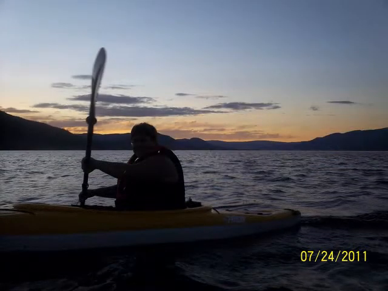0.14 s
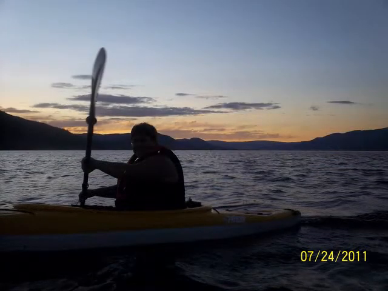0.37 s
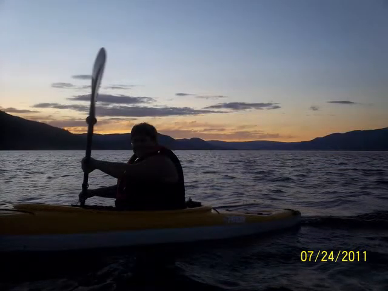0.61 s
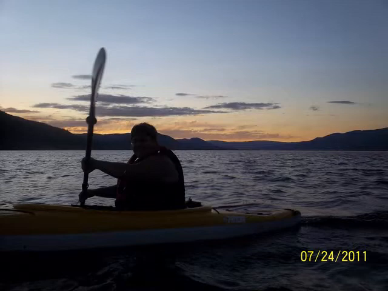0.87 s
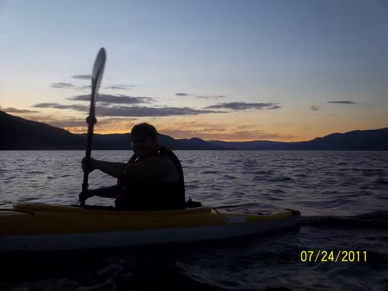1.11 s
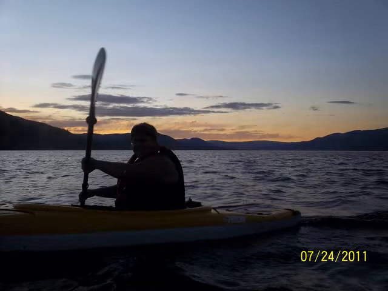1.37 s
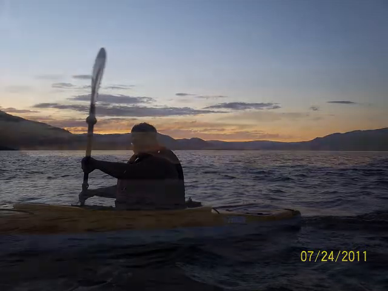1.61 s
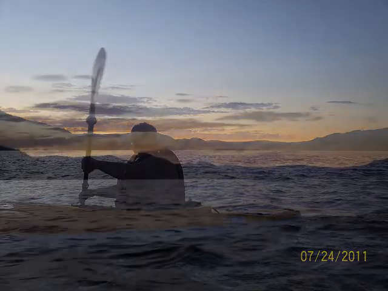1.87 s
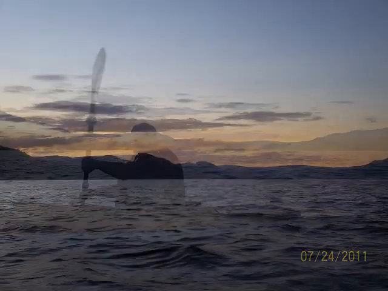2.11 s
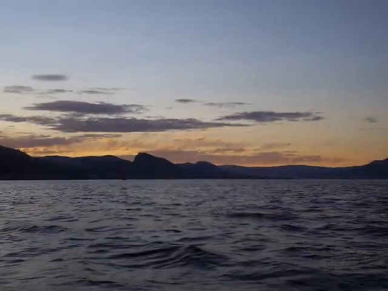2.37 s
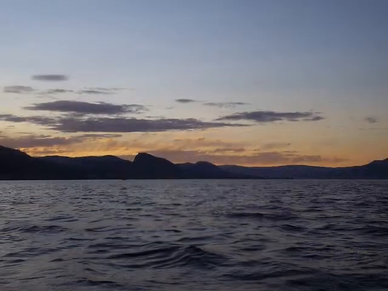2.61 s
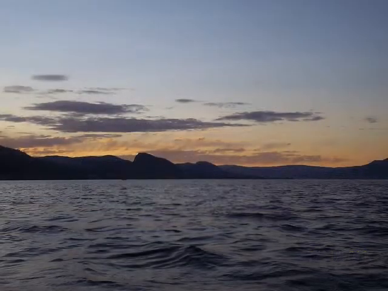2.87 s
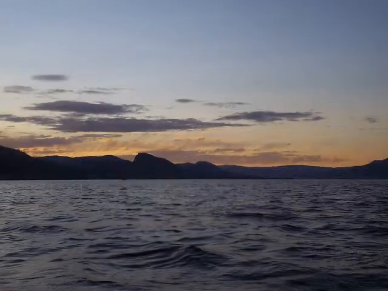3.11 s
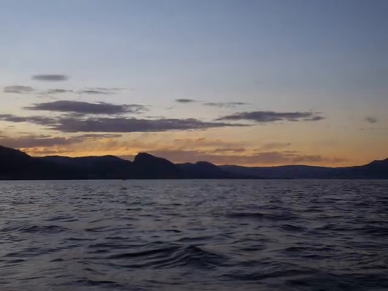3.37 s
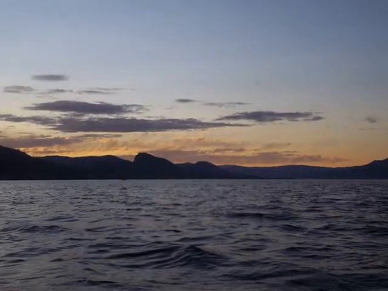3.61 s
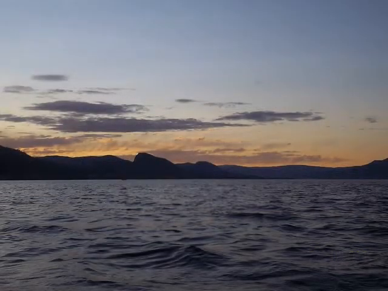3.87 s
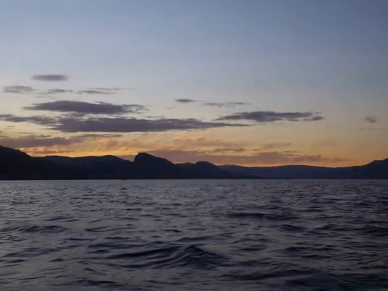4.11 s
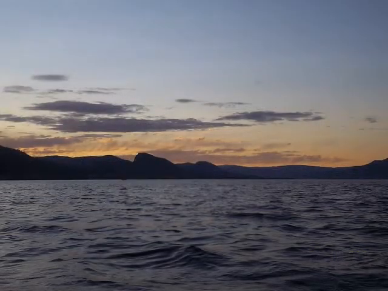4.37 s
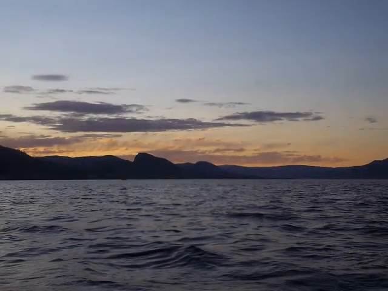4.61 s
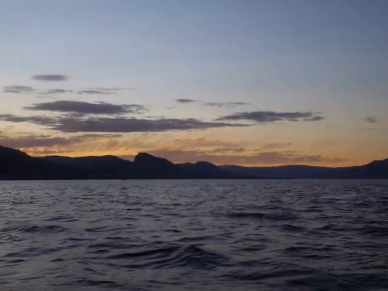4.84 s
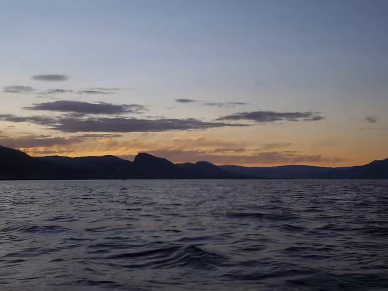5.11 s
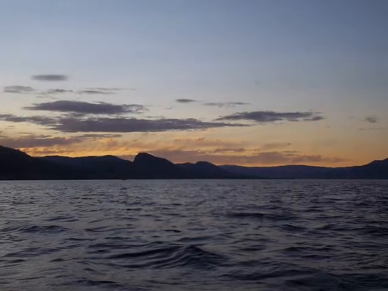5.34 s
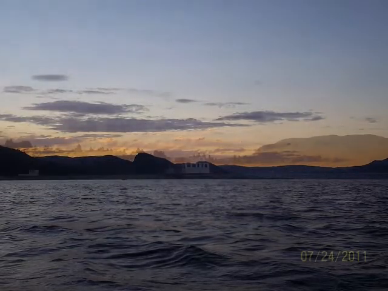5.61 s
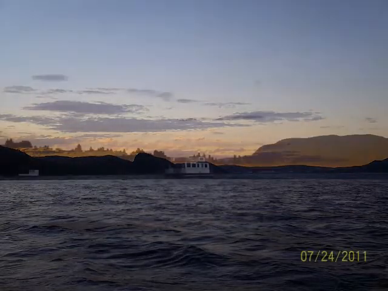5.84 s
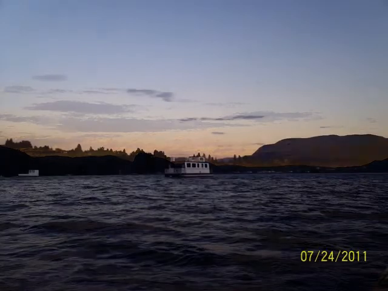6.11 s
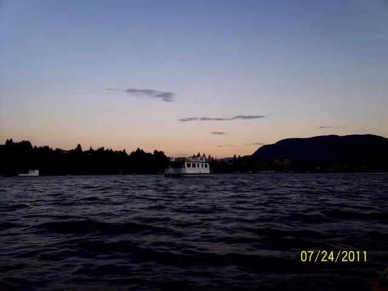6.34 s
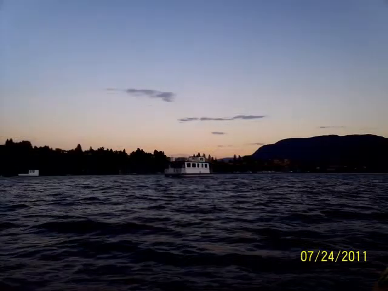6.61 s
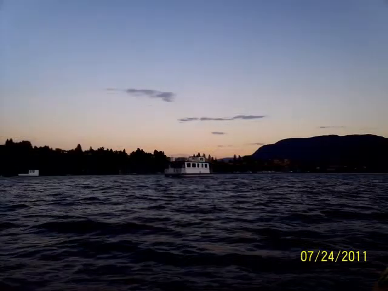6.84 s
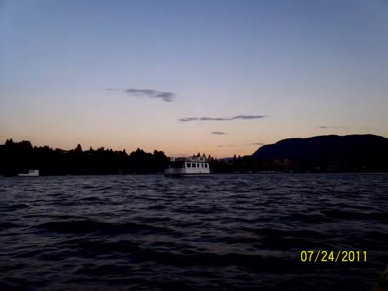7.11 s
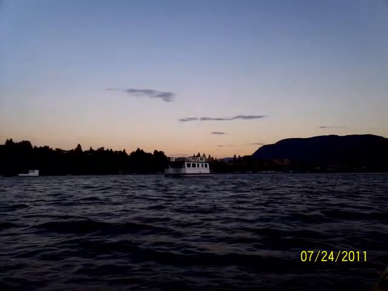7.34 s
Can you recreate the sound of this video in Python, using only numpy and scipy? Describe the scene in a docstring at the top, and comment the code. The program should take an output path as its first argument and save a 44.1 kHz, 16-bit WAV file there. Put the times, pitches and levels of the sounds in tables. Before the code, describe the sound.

Geese call over a wide lake for about seven and a half seconds, heard in mono with limited treble and brief, dull echoes. From 0 to 2 seconds, short reedy honks come in small clusters, low and high voices alternating, with gaps around 1.3 and 1.8 seconds. Between 2 and 3 seconds, another cluster includes growls breaking upward and a wavering high call; then a short lull. From 3.6 seconds the flock becomes louder, with a strong drawn low honk near 4.4. After 5 seconds, calls overlap thickly, nasal and raspy, with sharp breaks around 5.4, 5.9 and 6.4, continuing to the end. Faint distant honks murmur throughout. A very quiet water wash lies below, with weak hollow hull knocks near 0.5, 2.8, 4.4 and 5.8, tiny drip ticks near 1.6, 2.2 and 5.7, and a faint low hum gliding upward after 2 seconds.

```python
"""Geese calling over a wide lake

A flock of geese honks over water, a few calls at first, then more of them and louder.
Each honk is a stack of reedy tones shaped by a long throat; many start as a growl and break upward with a rasp.
Faint honks murmur far off. Filtered noise washes below, short low rings knock on a hull and drops tick.
A faint low hum rises in pitch.
"""
import sys
import numpy as np
from scipy import signal
from scipy.fft import rfft, irfft
from scipy.io import wavfile
from scipy.ndimage import uniform_filter1d

SR = 44100
rng = np.random.default_rng(int(sys.argv[2]) if len(sys.argv) > 2 else 0)


def elevation(decibels):
    """Turn decibel levels (scalar or array-like) into linear amplitude ratios."""
    levels = np.asarray(decibels, float)
    return 10 ** (levels / 20)


def output_pcm(signal):
    """Save a mono or channel-first signal as 16-bit PCM at the path in sys.argv[1].

    Samples are clipped to [-1, 1] before scaling.
    """
    pcm = np.clip(np.atleast_2d(signal).T, -1, 1) * 32767
    wavfile.write(sys.argv[1], SR, np.round(pcm).astype(np.int16))


N = 329427  # length in samples

# Low, high, low growling and high growling voice at middling effort and openness, against the second partial:
# growl_lines_db, first_db, third_db, fourth_db, hiss_db
VOICES = [(-21.5, -6.5, -10.5, -21.5, -30.5), (-19, -7, -29, -31.5, -29.5), (-7.5, -6, -1.5, -11.5, -30.5),
          (-11.5, -6.5, -21, -19.5, -28.5)]
# What the throat lets through: frequency_hz, level_db
THROAT = [(200, -40), (500, -6.5), (1200, 1.5), (1700, 6.5), (2300, -11), (3000, -14), (4500, -14),
          (6000, -23), (7200, -41.5)]
# Lines made when both sides of the voice organ (syrinx) sound: multiple_of_low_pitch, multiple_of_high_pitch
SUM_TONES = [(m, n) for m in range(-1, 7) for n in range(1, 5) if m] + [(3, -1)]
# Colour of the breath noise, before its level is set: frequency_hz, relative_level_db
BREATH_COLOUR = [(300, -30.5), (600, 1), (1300, 0.5), (1900, -1), (2600, -11.5), (4500, -11.5),
                 (6300, -15.5), (7400, -16)]
# Rasps where a voice breaks upward; rasp_db and treble_extra_db in geese() shift the levels:
# peak_time_s, peak_level_db, length_s, treble_db
RASPS = [(0.108, -32, 0.073, -7.5), (0.173, -31, 0.066, -33), (0.612, -32, 0.047, -22),
         (0.632, -39.5, 0.053, 1.5), (0.73, -35, 0.055, -43), (1.535, -37.5, 0.035, -29.5),
         (2.244, -34, 0.029, -39), (2.328, -23.5, 0.051, -31), (2.69, -36.5, 0.041, -14),
         (3.615, -26.5, 0.035, -30), (3.704, -38, 0.029, -21), (4.06, -30.5, 0.039, -30),
         (4.119, -25.5, .046, -34.5), (4.178, -33, 0.025, -13.5), (4.37, -32.5, 0.035, -12),
         (4.644, -33, 0.036, -22), (4.952, -32.5, 0.039, -21), (5.012, -24, 0.041, -20),
         (5.407, -17, 0.037, -38.5), (5.585, -52, 0.027, -23), (5.848, -25.5, 0.05, -26),
         (5.93, -18.5, 0.032, -27), (6.362, -11.5, 0.021, -32), (6.568, -28, .074, -19),
         (6.823, -20, 0.058, -18), (6.993, -36, 0.016, -25.5), (7.356, -21.5, 0.076, -19.5)]
# Wavelets knocking on the hull: start_s, level_db, pitch_hz
KNOCKS = [(0.479, -33.5, 190), (0.632, -39, 156.6), (2.814, -40, 188), (4.448, -38, 190),
          (5.798, -34.5, 248)]
# Ticking drops, before a gain in knocks(): start_s, level_db
TICKS = [(1.6334, -49), (2.162, -47.5), (5.6998, -42.5)]
# Colour of the water wash, before its level is set: frequency_hz, relative_level_db
WASH_COLOUR = [(18, -40.5), (30, -11), (112, 1), (227, 0), (392, -8), (777, -6.5), (1250, -14), (1370, -10),
               (1650, -17.5), (1930, -16.5), (4000, -26.5), (4900, -29), (6900, -35.5), (8970, -68),
               (15200, -120)]
# Swell of the wash, before a gain in wash(): time_s, level_db
WASH_SWELL = [(0.0, -56), (0.91, -60), (2.93, -61.5), (3.22, -62), (4.99, -59), (5.28, -57.5),
              (6.011, -58.5), (7.261, -58.5), (7.47, -55)]
# Path of the hum, before a gain in hum(): time_s, pitch_hz, level_db
HUM_PATH = [(2.0, 48, -70), (2.9, 48.5, -64.5), (3.28, 49.5, -57.5), (4.251, 55.8, -61), (5.63, 64.3, -65),
            (6.19, 68, -66), (6.95, 67, -62), (7.47, 68, -75)]
# Echoes off the water and the shore: delay_s, level_db
ECHOES = [(.011, -9.5), (.043, -27.5), (.078, -36.5), (0.12, -39.5), (.155, -34.5)]
# Low honks: start_s, length_s, crest_pitch_hz, second_partial_crest_db, upper_partials_db
LOW_HONKS = [(0.168, .175, 579.5, -34.5, -14.5), (0.646, .11, 644, -45, -14),
             (1.008, .115, 631, -41.5, -19), (2.017, .15, 621.3, -43, -7),
             (2.246, 0.11, 630.6, -35.5, -16.5), (2.298, .165, 590, -32.5, -10.5),
             (3.615, 0.1, 654.6, -31.5, -17), (4.169, 0.14, 626.7, -32.5, -9),
             (4.351, 0.14, 646, -31.5, -10), (5.046, .145, 652.3, -39, -5.5), (5.582, 0.102, 664, -56.5, 6),
             (6.338, .085, 610.4, -33.5, -13.5), (6.564, .1, 631.4, -39.5, -9),
             (7.359, .113, 626.4, -23.5, -13.5)]
# High honks that swoop up, then sag: start_s, length_s, crest_pitch_hz, second_partial_crest_db, upper_partials_db
ARCHING_HONKS = [(.722, 0.11, 828, -35.5, -29), (1.53, 0.12, 871.5, -39, -11),
                 (1.64, 0.041, 916, -52.5, -6), (3.678, 0.11, 843, -27.5, -21),
                 (4.122, .09, 888, -29.5, -9), (4.995, .05, 776, -31.5, -42), (5.85, 0.054, 895, -37.5, -1),
                 (6.56, 0.089, 867, -42, -1)]
# High honks that only fall: start_s, length_s, crest_pitch_hz, second_partial_crest_db, upper_partials_db
FALLING_HONKS = [(.595, 0.1, 851, -38.5, -16), (1.08, 0.053, 820, -54, -7), (1.69, 0.09, 801, -37, -20),
                 (2.362, 0.088, 858, -34, -12.5), (2.84, 0.1, 665, -50.5, -8.5),
                 (2.921, 0.101, 909, -54.5, 3), (4.715, 0.057, 819, -53.5, -8), (4.85, .09, 933, -55.5, 4),
                 (4.999, 0.1, 871, -39, 4.5), (5.082, .11, 853, -53.5, -8), (5.32, 0.043, 765, -39, -13),
                 (5.396, 0.13, 841, -23.5, -17), (6.054, .095, 861, -53, -6.5),
                 (6.339, 0.087, 826, -31, -10), (6.823, 0.096, 868, -29, 5), (7.07, 0.12, 914, -58, -14),
                 (7.36, 0.098, 795, -32, -1)]
# Growls, mostly leading into a honk: start_s, length_s, mid_pitch_hz, mid_level_db, cycles_per_pattern
GROWLS = [(0.523, .08, 541, -58.5, 3), (0.903, .105, 545, -56, 2), (1.372, .17, 722, -60.5, 4),
          (1.891, .13, 526, -51, 2), (2.142, 0.12, 512, -55, 3), (2.596, 0.073, 536, -61, 3),
          (3.515, .11, 547, -53.5, 3), (3.995, .07, 690, -56, 4), (4.052, .115, 551.5, -45, 2),
          (4.946, .085, 577.3, -45.5, 3), (5.502, 0.11, 605, -49.5, 4), (5.794, 0.083, 629, -55, 3),
          (6.17, .045, 598.6, -50.5, 3), (6.449, 0.039, 579, -56.5, 3), (6.498, .065, 796, -50, 3),
          (6.732, .105, 551, -47.5, 3), (6.872, .11, 534, -44.5, 3), (7.279, 0.073, 530, -46.5, 3)]
# Shape of low, arching and falling honks and growls, against the crest:
# crest_as_share_of_length, start_pitch_percent, end_pitch_percent, start_level_db, end_level_db
SHAPES = [(.43, -7, -11.5, -14, -20), (.38, -6, -17.5, -5.5, -13.5), (0.32, 4.5, -10.5, -15.5, -10),
          (0.468, -7.5, 6, -8.5, 5.5)]
# Calls with their own drawn pitch and level path, some wavering, some a single rise and fall.
# A list of points for each call: time_s, pitch_hz, second_partial_db
DRAWN_CALLS = [
    [(0.0, 532, -49), (0.04, 542.5, -44.5), (0.06, 606, -43), (0.11, 622.4, -43), (0.17, 609, -46.5)],
    [(2.675, 793, -39), (2.72, 780.5, -37.5), (2.77, 686, -44.5), (2.81, 728, -38), (2.85, 881, -47.5),
     (2.89, 804, -41.5), (2.94, 732, -38), (3.0, 577, -58)],
    [(4.225, 475, -46.5), (4.27, 530.4, -34), (4.33, 549, -26), (4.38, 591.6, -21.5), (4.43, 587, -29),
     (4.47, 539.5, -32), (4.505, 485, -70)],
    [(4.635, 578, -47), (4.67, 603, -39.5), (4.71, 655, -38), (4.755, 621, -56)],
    [(5.17, 477.6, -55.5), (5.22, 513, -39), (5.27, 537, -34.5), (5.31, 569, -36), (5.34, 532.6, -32.5),
     (5.39, 549, -35.5), (5.43, 554, -34), (5.465, 622, -34.5), (5.51, 567, -52)],
    [(5.575, 862, -35.5), (5.61, 881, -31.5), (5.64, 864, -35.5), (5.67, 795, -49)],
    [(5.855, 639, -38), (5.9, 625.6, -23), (5.935, 609.5, -33.5), (5.965, 623, -30.5), (6.0, 587, -50.5)],
    [(5.935, 853, -34), (5.97, 879, -25.5), (6.01, 837, -33.5), (6.04, 806, -42), (6.07, 758, -52)],
    [(6.21, 576, -46), (6.225, 583.6, -37.5), (6.25, 608, -34), (6.33, 652, -33), (6.365, 661, -41)],
    [(6.985, 549, -34.5), (7.01, 574.5, -22.5), (7.04, 582.7, -23), (7.075, 563, -24), (7.11, 541, -30.5),
     (7.15, 488, -48.5)],
]
# Voices of the drawn calls: cycles_per_pattern, first_db, third_db, fourth_db, upper_partials_db
DRAWN_VOICES = [(1, -7, -15.5, -17.5, -17), (1, -6.5, -18.5, -27, -15), (1, -10, -11, -19.5, -18),
                (1, -1, -9.5, -21, -14.5), (1, -2.5, -5, -12, -17.5), (4, -20, -26.5, -46, -18.5),
                (1, -20.5, -14, -22.5, -16.5), (1.2, -6, -24, -28, 2.5), (2, -7.5, -13, -23, -13.5),
                (3, -14.5, -13.5, -21, -9)]
# Low honks whose other side sounds the next high note: start_s, plain_sum_db, floor_of_further_sums_db
TWO_VOICED = [(.64, -23, -20), (1.01, -10, -30), (2.3, -17.5, -16), (3.61, -14.5, -15.5),
              (4.635, -10.5, -22), (5.045, 3.5, -12.5), (5.17, -14.5, -11), (5.58, -10.5, -11),
              (5.855, -10.5, -12.5), (6.34, -15, -12), (6.56, 3.5, -13.5), (6.985, -2.5, -9),
              (7.355, -15, -6.5)]

# Effort is the crest level above MIDDLING_DB: each dB lowers the first partial and lifts the hiss
# against the second partial.
MIDDLING_DB, FIRST_PER_DB, HISS_PER_DB = -34.5, -0.25, 0.24
# An open throat lifts everything beside the second partial; these are dB per dB of openness.
MIDDLING_UPPER_DB, FIRST_PER_UPPER, THIRD_PER_UPPER = -11.5, 0.4, 0.31
FOURTH_PER_UPPER, HISS_PER_UPPER = 0.72, 0.36


def geese(clear=0.1, grainy=0.18, growling=0.41, split_hz=2500, rasp_db=-15, treble_extra_db=5.5):
    """All near calls, their sum tones, and noisy air that follows each call and bursts out in the rasps."""
    out, low_air, high_air = np.zeros((3, N))
    flock = calls()
    curves = []
    for rows, kind, cycles, *_ in flock:
        if kind > 1 or cycles == 2:
            rough = growling
        else:
            rough = grainy if cycles > 1 else clear
        curves.append(voice_curves(rows, rough))

    for curve, call in zip(curves, flock):
        t, pitch, phase, level = curve
        rows, kind, cycles, first_db, third_db, fourth_db, upper_db = call
        growl_db, *_, hiss_db = VOICES[kind]
        hiss_db += HISS_PER_DB * (rows[:, 2].max() - MIDDLING_DB)
        hiss_db += HISS_PER_UPPER * (upper_db - MIDDLING_UPPER_DB)
        out[t] += honk(pitch, phase, level, (cycles, growl_db, first_db, third_db, fourth_db, upper_db))
        low_air[t] += elevation(level + hiss_db + 6.0)
        high_air[t] += elevation(level + hiss_db)

    def call_from(start, wanted):
        """First call of one kind that starts at this time or later, give or take 12 ms."""
        return next(c for c, call in zip(curves, flock) if call[1] == wanted and call[0][0, 0] > start - 0.012)

    for start, mix_db, floor_db in TWO_VOICED:
        t, tones = sum_tones(call_from(start, 0), call_from(start, 1), mix_db, floor_db)
        out[t] += tones

    time = np.arange(N) / SR
    for peak_time, db, length, treble_db in RASPS:
        puff = elevation(db + rasp_db) * np.exp(-8 * ((time - peak_time) / length) ** 2)
        low_air += puff
        high_air += puff * elevation(treble_db + treble_extra_db)

    puffs = elevation(0.87 * drift(200))  # the air comes in uneven puffs
    air = rms_one(coloured(puffs * rng.standard_normal(N), BREATH_COLOUR))
    dull = signal.sosfiltfilt(signal.butter(2, split_hz, fs=SR, output="sos"), air)
    return out + low_air * dull + high_air * (air - dull)


def calls(high_from_hz=720, high_growl_from_hz=597, growl_upper_db=-11):
    """Every call in time order: curve, kind (row of VOICES), cycles, then first to fourth and upper levels in dB."""
    out = []
    for table, shape, kind in zip((LOW_HONKS, ARCHING_HONKS, FALLING_HONKS), SHAPES, (0, 1, 1)):
        _, first, third, fourth, _ = VOICES[kind]
        for *row, upper_db in table:
            opening, effort = upper_db - MIDDLING_UPPER_DB, row[3] - MIDDLING_DB
            first_db = first + FIRST_PER_DB * effort + FIRST_PER_UPPER * opening
            third_db = third + THIRD_PER_UPPER * opening
            fourth_db = fourth + FOURTH_PER_UPPER * opening
            out.append((arch(*row, shape), kind, 1, first_db, third_db, fourth_db, upper_db))
    for *row, cycles in GROWLS:
        kind = 2 + (row[2] > high_growl_from_hz)
        _, first, third_db, fourth_db, _ = VOICES[kind]
        first_db = first + FIRST_PER_DB * (row[3] - MIDDLING_DB)
        out.append((arch(*row, SHAPES[3]), kind, cycles, first_db, third_db, fourth_db, growl_upper_db))
    for rows, voice in zip(DRAWN_CALLS, DRAWN_VOICES):
        out.append((np.array(rows), int(rows[0][1] > high_from_hz), *voice))
    return sorted(out, key=lambda call: call[0][0, 0])


def arch(start, length, hz, db, shape, break_db=-4.5, break_percent=-5):
    """Pitch and level bend away from the crest on both sides, as a breath builds and fades."""
    crest, start_percent, end_percent, start_db, end_db = shape
    # a honk that breaks out of a growl starts close to its crest in level and pitch
    if any(abs(at + long - start) < 0.012 for at, long, *_ in GROWLS):
        start_db, start_percent = break_db, max(start_percent, break_percent)
    u = np.linspace(0, 1, 12)
    rising = u < crest
    away = np.where(rising, 1 - u / crest, (u - crest) / (1 - crest))
    # the powers round the curves about the crest
    pitch = hz * (1 + np.where(rising, start_percent, end_percent) / 100 * away ** 2.1)
    level = db + np.where(rising, start_db * away ** 2.8, end_db * away ** 2.5)
    return np.transpose([start + length * u, pitch, level])


def voice_curves(rows, rough, jitter=0.019, shimmer_db=5.0, fade_s=0.007):
    """Sample numbers, pitch, phase and level of one voice; rough voices waver in pitch and strength."""
    s, hz, db = np.transpose(rows)
    t = np.arange(int((s[0] - fade_s) * SR), min(int((s[-1] + fade_s) * SR), N))
    t = t[t >= 0]
    smooth = int(0.01 * SR)
    pitch = uniform_filter1d(np.interp(t / SR, s, hz), smooth)
    pitch = pitch * (1 + jitter * rough * drift(72, size=len(t)))
    level = uniform_filter1d(np.interp(t / SR, s, db), smooth // 2)
    level = level + shimmer_db * rough * drift(70, size=len(t))
    edge = np.clip(np.minimum(t / SR - s[0], s[-1] - t / SR) / fade_s + 1, 1e-4, 1)
    phase = np.cumsum(2 * np.pi * pitch / SR)
    return t, pitch, phase, level + 40 * np.log10(edge)


def honk(pitch, phase, level, voice, flicker_db=4.0, effort=1.2, even_hz=2200, width_hz=1200, first_holds=0.33):
    """Partials of the pitch, plus growl lines between them when the cycles repeat in a longer pattern."""
    cycles, growl_db, first_db, third_db, fourth_db, upper_db = voice
    cycles = max(round(cycles), 1)
    below_peak = level - level.max()
    # the first partial does not follow the whole fall in level
    first_db = first_db + first_holds * np.minimum(-below_peak, 20)
    own_db = {cycles: first_db, 2 * cycles: 0, 3 * cycles: third_db, 4 * cycles: fourth_db}
    out = 0
    for k in range(1, int(7300 * cycles / pitch.max())):  # lines up to about 7300 Hz
        hz = pitch * k / cycles
        is_between = k % cycles > 0
        high = np.clip((hz - even_hz) / width_hz, 0, 1)
        bright = upper_db + effort * high * below_peak  # a weaker breath is duller
        # high up the growl lines catch up with the partials
        between = growl_db + high * min((cycles - 1) / 2, 1) * (bright - growl_db)
        db = own_db.get(k, at_hz(THROAT, hz) + (between if is_between else bright))
        # weak lines flicker most: the upper partials and the low growl lines
        unsteady = 0.1 + np.maximum(0.8 * high, 1.1 * (1 - high) * is_between)
        db = db + flicker_db * unsteady * drift(25, size=len(hz))
        out = out + elevation(db) * np.sin(phase * k / cycles + rng.uniform(0, 2 * np.pi))
    return out * elevation(level)


def sum_tones(low, high, mix_db, floor_db, order_db=-10.5, low_share=0.71):
    """Both sides of the syrinx mix into lines at m times the low pitch plus n times the high one."""
    t, i, j = np.intersect1d(low[0], high[0], return_indices=True)
    _, low_hz, low_phase, low_db = low
    _, high_hz, high_phase, high_db = high
    level = low_share * low_db[i] + (1 - low_share) * high_db[j]  # follows mostly the low side
    out = np.zeros(len(t))
    for m, n in SUM_TONES:
        order = max(m, -2 * m) + n - 2  # 0 for the plain sum
        colour = at_hz(THROAT, abs(m * low_hz[i] + n * high_hz[j])) + max(order_db * order, floor_db)
        phase = m * low_phase[i] + n * high_phase[j] + rng.uniform(0, 2 * np.pi)
        out += elevation(level + mix_db + colour) * np.sin(phase)
    return t, out


def far_flock(count=70, level_db=-75.0, spread_db=10.0):
    """Faint, dull honks of geese far across the water, at random moments and pitches."""
    out = np.zeros(N)
    for when, high, long, loud in rng.random((count, 4)):
        start, hz, length = when * (N / SR - 0.3) + 0.018, 520 + 380 * high, 0.074 + 0.14 * long
        db = level_db + spread_db * (2 * loud - 1)
        rows = [(start, 0.86 * hz, db - 7.5), (start + 0.4 * length, hz, db), (start + length, hz, db - 9.0)]
        t, pitch, phase, level = voice_curves(rows, 1.0)
        cycles = 1 + 2 * (long > 0.6)  # the longer ones growl
        out[t] += honk(pitch, phase, level, (cycles, -6.0, -3.0, -12.0, -25.0, -25.0))
    return out


def open_water(x, dull_hz=2500):
    """Adds a few dull echoes, each smeared over a time that grows with its delay."""
    answer = np.zeros(int(0.2 * SR))
    for delay, db in ECHOES:
        i, spread = int(delay * SR), int(0.23 * delay * SR)
        answer[i:i + spread] += elevation(db) * rng.standard_normal(spread) / np.sqrt(spread)
    dull = signal.sosfilt(signal.butter(1, dull_hz, fs=SR, output="sos"), answer)
    return x + signal.fftconvolve(x, dull)[:N]


def wash(patchy_db=1.0, gain_db=5.0):
    """Water noise in half-octave bands, each flickering a little on its own."""
    out = 0
    edges = 34 * 2 ** np.arange(0, 8.6, 0.5)  # Hz
    noise = coloured(rng.standard_normal(N), WASH_COLOUR)
    for low, high in zip(edges, edges[1:]):
        band = signal.sosfilt(signal.butter(2, [low, high], "band", fs=SR, output="sos"), noise)
        out = out + band * elevation(patchy_db * drift(8))
    s, db = np.transpose(WASH_SWELL)
    return rms_one(out) * elevation(np.interp(np.arange(N) / SR, s, db) + gain_db)


def knocks(ring_t60_s=0.047, tick_t60_s=0.0055, tick_gain_db=4.0):
    """Hollow low rings on the hull and short bright ticks of noise; t60 is the time to fall by 60 dB."""
    rings, ticks = np.zeros((2, N))
    t = np.arange(int(0.15 * SR)) / SR
    for start, db, hz in KNOCKS:
        i = int(start * SR)
        soft_start = 1 - np.exp(-t / 0.0014)
        rings[i:i + len(t)] += elevation(db - 60 * t / ring_t60_s) * soft_start * np.sin(2 * np.pi * hz * t)
    for start, db in TICKS:
        i = int(start * SR)
        ticks[i:i + len(t)] += elevation(db + tick_gain_db - 60 * t / tick_t60_s) * rng.standard_normal(len(t))
    return rings + signal.sosfilt(signal.butter(2, [900, 5600], "band", fs=SR, output="sos"), ticks)


def hum(waver_db=2.0, gain_db=2.5):
    """A low gliding tone and its octave, wavering in level."""
    s, hz, db = np.transpose(HUM_PATH)
    t = np.arange(N) / SR
    level = np.interp(t, s, db, left=-90) + gain_db + waver_db * drift(2.2)
    phase = np.cumsum(2 * np.pi * np.interp(t, s, hz) / SR)
    octave = elevation(-6.0 + waver_db * drift(7.1)) * np.sin(2 * phase)
    return elevation(level) * (np.sin(phase) + octave)


def rms_one(x):
    """Scales a signal to an average strength (rms) of 1."""
    return x / np.sqrt(np.mean(x ** 2) + 1e-20)


def at_hz(points, hz):
    """Reads a level off a frequency table, along a logarithmic frequency scale."""
    table = np.array(points)
    return np.interp(np.log(np.maximum(hz, 1)), np.log(table[:, 0]), table[:, 1])


def drift(rate_hz, size=N):
    """Slow random wander of rms 1: noise sent twice through a one-pole low-pass."""
    r = np.exp(-2 * np.pi * rate_hz / SR)
    lead = int(SR / rate_hz)  # run-in, thrown away
    noise = rng.standard_normal(size + lead)
    return rms_one(signal.lfilter([1], [1, -2 * r, r * r], noise)[lead:])


def coloured(x, spectrum):
    """Shapes a sound by scaling each frequency by a table."""
    hz = np.arange(N // 2 + 1) * SR / N
    return irfft(rfft(x) * elevation(at_hz(spectrum, hz)), N)


def scene():
    """Near and far geese with their echoes, over the water and the hum."""
    flock = open_water(geese() + far_flock())
    return (flock + wash() + knocks() + hum())[None]


def top_cut(x):
    """Nothing passes above the cut-off."""
    return signal.sosfilt(signal.butter(12, 7180, fs=SR, output="sos"), x)


def record(dry):
    """The microphone drops the lowest bass and the recorder cuts the top steeply."""
    x = signal.sosfilt(signal.butter(2, 42, "high", fs=SR, output="sos"), dry)
    x = signal.sosfilt(signal.cheby1(12, 0.5, 7100, fs=SR, output="sos"), x)
    return top_cut(x)


dry = scene()
out = record(dry)
output_pcm(out)
```